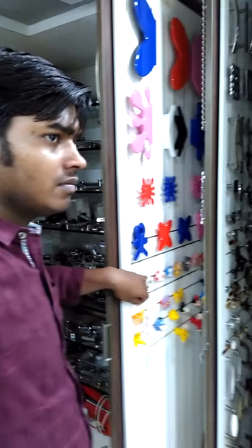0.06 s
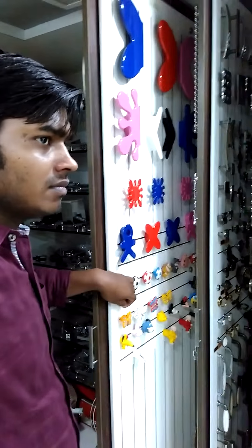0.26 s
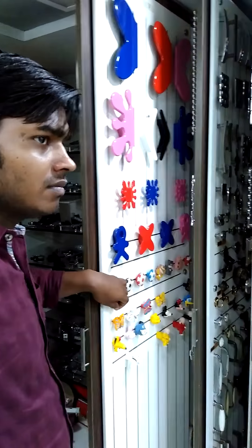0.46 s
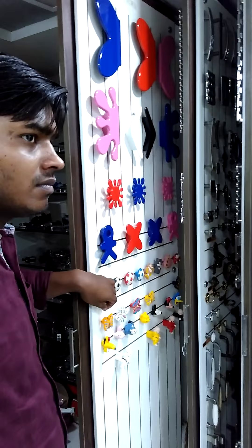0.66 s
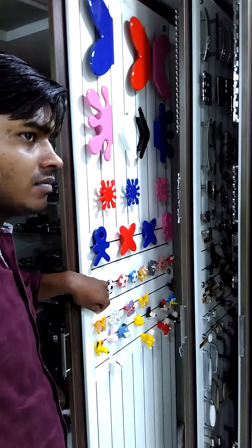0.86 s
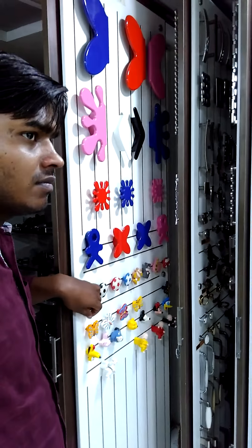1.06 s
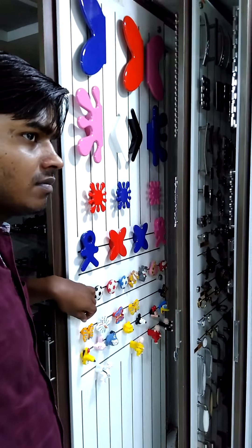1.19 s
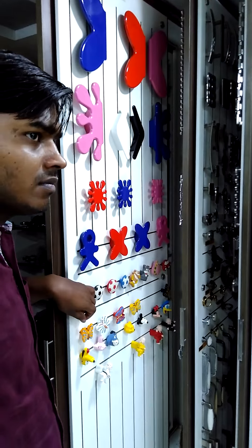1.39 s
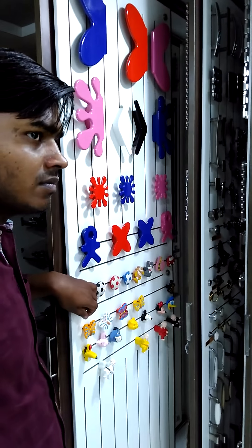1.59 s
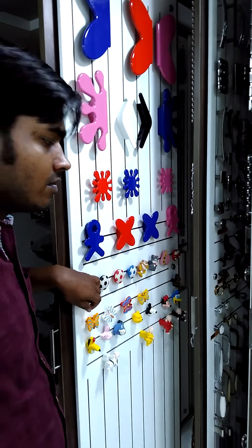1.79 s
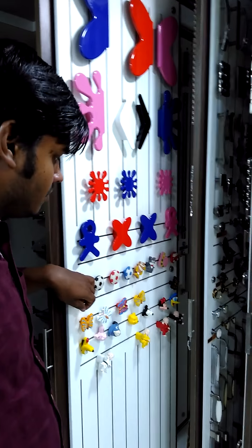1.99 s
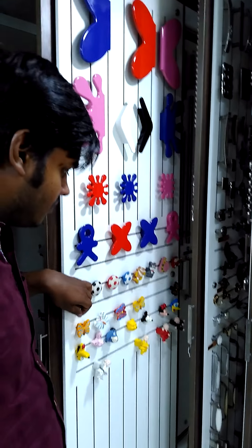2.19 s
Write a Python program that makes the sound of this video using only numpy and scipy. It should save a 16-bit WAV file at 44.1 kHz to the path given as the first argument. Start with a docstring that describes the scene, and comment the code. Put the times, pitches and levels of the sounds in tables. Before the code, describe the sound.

A metal panel slides out of its rack in a shop. Faint movement and a light knock open; a dull frame thud lands near 0.25-0.3 s. Thin high squeals follow to 0.65 s, then rough scraping with jittery groans until 1.2 s. After a lull, scraping and squeals return at 1.4-1.65 s. Loose fittings clatter from 1.83 to 2.04 s. Short room tail, quiet hiss and low building noise.

```python
"""A tall metal display panel is dragged out of its rack in a shop: the runners scrape (banded noise in strokes),
groan by stick-slip (jittery tones) and squeal (brief gliding sines). Low noise swells with the strokes, the frame
thuds as it comes free, and loose fittings knock, then rattle when it stops (decaying modes). Room tail, low building
noise and air lie behind. The right microphone is shaded in the treble; the two ports take the bass in opposite phase."""
import sys
import numpy as np
from scipy import signal
from scipy.fft import rfft, irfft, next_fast_len
from scipy.io import wavfile
from scipy.ndimage import uniform_filter1d, map_coordinates

SR = 44100
rng = np.random.default_rng(int(sys.argv[2]) if len(sys.argv) > 2 else 0)


def put_to_file(sound):
    """Save the sound as 16-bit audio at rate SR, in the file named by the first command-line argument."""
    columns = np.atleast_2d(sound).T  # one column per channel
    safe = np.clip(columns, -1, 1)
    whole_steps = np.round(safe * 32767)
    wavfile.write(sys.argv[1], SR, whole_steps.astype(np.int16))


N = 99225


def scrape():
    """Friction noise ringing in the rails: three noise bands, each following the strokes."""
    # rail response in each band: (frequency [Hz], relative level [dB])
    low_mids = [(400, -15), (900, -0.5), (1500, 0), (2500, 2.5), (2900, -1.5), (3300, -65)]
    # (frequency [Hz], relative level [dB])
    mids = [(2700, -68), (3120, -16.5), (3430, -1), (3800, -10.5), (5300, -8), (6800, -11.5), (7600, -43)]
    # (frequency [Hz], relative level [dB])
    treble = [(6500, -26), (7000, -8), (8000, -3.5), (10000, 1.5), (12000, 0.5), (13500, -10.5),
              (14300, -18)]
    bands = [rush(gain_curve(points), patchy_db=4.6, grain_db=1.7) for points in (low_mids, mids, treble)]
    band_gains = strokes()[1:]
    return amp(-7.0) * (band_gains * bands).sum(axis=0)


def groan():
    """The runner sticks and slips at an uneven rate: a jittery fundamental and its octave."""
    # stick-slip groans: (start [s], length [s], first pitch [Hz], last pitch [Hz],
    # relative level [dB], relative octave level [dB], pitch jitter [share])
    groan_table = [(0.683, 0.035, 1280, 1281, -26.5, -36.5, 0.018),
                   (0.741, 0.068, 1273, 1289, -17.5, -31, 0.0051),
                   (0.805, 0.0858, 1243, 1182, -20, -22.5, 0.013),
                   (0.893, 0.056, 1233, 1261, -22.5, -29, 0.016),
                   (0.966, 0.068, 1443, 1375, -17, -34.5, 0.0277),
                   (1.066, 0.072, 1336, 1162, -20, -27.5, .045),
                   (1.146, 0.086, 1002, 1081, -21, -34.5, 0.0444),
                   (1.478, 0.051, 1480, 1338, -28, -34, 0.068), (1.555, 0.061, 1096, 1128, -26, -26, 0.04)]
    attack_s, t60_s, shimmer_db = 0.0064, 0.012, 3.5
    out = np.zeros(N)
    for start_s, length_s, first_hz, last_hz, db, octave_db, jitter in groan_table:
        phase = glide(start_s, length_s, first_hz, last_hz, jitter * wobble(250))
        tone = amp(db) * np.sin(phase) + amp(octave_db) * np.sin(2 * phase)
        shimmer = amp(3 + shimmer_db * wobble(90.2))
        out += shimmer * burst(start_s, length_s, attack_s, t60_s) * tone
    return out


def squeals():
    """Single rail modes sing briefly and stop short; the low ones are hoarse."""
    # squeals of the runners: (start [s], length [s], first pitch [Hz], last pitch [Hz], relative level [dB])
    squeal_table = [(.374, .035, 9200, 9210, -17), (.415, .054, 9200, 9040, -16),
                    (.49, .041, 9200, 9030, -15.5), (.47, .025, 8050, 8020, -15),
                    (.581, .03, 9170, 9130, -23), (.633, .03, 9130, 9100, -24),
                    (.93, .035, 9040, 9000, -19), (1.03, .035, 8350, 8150, -18),
                    (1.2, .075, 11750, 11900, -23), (1.29, .04, 9720, 9650, -26),
                    (1.515, .045, 7980, 7920, -21), (1.6, .07, 10650, 10570, -23),
                    (.607, .035, 4200, 4350, -36), (1.487, .045, 3460, 3340, -20),
                    (1.582, .07, 3440, 3530, -15.5), (1.175, .07, 3350, 3280, -26),
                    (.41, .022, 2600, 2660, -31), (1.415, .055, 3440, 3400, -26),
                    (.97, .04, 3560, 3490, -26)]
    attack_s, t60_s, waver_hz, hoarse_below_hz = 0.012, 0.035, 45, 5000
    out = np.zeros(N)
    for start_s, length_s, first_hz, last_hz, db in squeal_table:
        hoarse = 4 if first_hz < hoarse_below_hz else 1  # widens and speeds up the waver
        waver = hoarse * waver_hz / first_hz * wobble(60 * hoarse)
        phase = glide(start_s, length_s, first_hz, last_hz, waver)
        level = amp(db + 2.05 * wobble(50 * hoarse))
        out += level * burst(start_s, length_s, attack_s, t60_s) * np.sin(phase)
    return out


def strokes():
    """Stop-and-go of the slide: the gain of each band over all strokes."""
    # (start [s], length [s], then relative levels: rumble [dB], low mids [dB], mids [dB], treble [dB])
    stroke_table = [(0, 0.12, -36.5, -33.5, -54, -50), (0.153, 0.029, -32.5, -36.5, -49, -31),
                    (0.194, 0.059, -51, -38, -41, -17.5), (0.238, 0.025, -16, -25, -13, -17),
                    (0.284, 0.065, -23.5, -35, -36.5, -24), (0.343, 0.037, -23, -25, -28.5, -17),
                    (0.392, 0.06, -30, -32, -41.5, -30), (0.444, 0.078, -41.5, -44, -37.5, -20),
                    (0.558, 0.091, -59, -46.5, -44.5, -23.5), (0.655, 0.059, -49, -31.5, -17.5, -17.5),
                    (0.721, 0.076, -42, -30.5, -21.5, -14.5), (0.785, 0.14, -36, -27.5, -19, -12.5),
                    (0.956, 0.074, -37.5, -26, -15, -12.5), (1.051, 0.086, -29.5, -20, -16.5, -12.5),
                    (1.148, 0.11, -36.5, -28.5, -19, -10.5), (1.264, 0.074, -76, -33.5, -46.5, -26),
                    (1.349, 0.046, -74, -42, -32.5, -18.5), (1.397, 0.09, -67, -33, -16, -13),
                    (1.484, 0.057, -44, -22.5, -18.5, -12.5), (1.551, 0.071, -35, -25.5, -17, -14.5),
                    (1.632, 0.034, -71, -36, -38, -24.5)]
    attack_s, t60_s = 0.023, 0.11
    return sum(amp(levels)[:, None] * burst(start_s, length_s, attack_s, t60_s)
               for start_s, length_s, *levels in stroke_table)


def low_rumble():
    """Broadband low noise swelling with the strokes, over a faint steady floor."""
    # (frequency [Hz], relative level [dB])
    rumble_colour = [(20, -18), (100, 0.5), (280, -2.5), (600, -7.5), (1000, -13), (1600, -34.5)]
    return (amp(-44) + strokes()[0]) * rush(gain_curve(rumble_colour), patchy_db=4.0, grain_db=5.0)


def frame_thuds():
    """The frame thuds as it comes free: low sines with a fast onset and exponential decay."""
    # (time [s], pitch [Hz], relative level [dB])
    thud_table = [(.249, 195, -15), (0.257, 226, -12.5), (0.28, 119, -3.5), (0.301, 169.6, -3)]
    t60_s, onset_s = 0.1, 0.00047
    out = np.zeros(N)
    for start_s, hz, db in thud_table:
        t = np.clip(np.arange(N) / SR - start_s, 0, None)
        envelope = amp(db - 60 * t / t60_s) * (1 - np.exp(-t / onset_s))
        out -= envelope * np.sin(2 * np.pi * hz * t)
    return out


def fittings():
    """Each contact rings the loose fittings anew with a noise crack; many small ones fill the rattle."""
    # single contacts: (time [s], relative level [dB])
    knock_table = [(0.03, -21), (0.252, -30), (0.359, -17), (0.421, -29)]
    # contacts of the final rattle: (time [s], relative level [dB])
    rattle_table = [(1.8242, -22.5), (1.8381, -13), (1.8428, -5.5), (1.8477, -3.5), (1.8552, -7.5),
                    (1.8627, -19), (1.874, -14.5), (1.8962, -17.5), (1.9396, -20), (1.9466, -14.5),
                    (1.9672, -19), (1.9831, -7.5), (1.992, -24), (2.0066, -20.5)]
    # modes of the loose fittings: (mean frequency [Hz], mean relative level [dB])
    fitting_modes = [(1150, -13.5), (1420, -14.5), (1540, 2.5), (1750, 5), (1900, 0), (2260, -2.5),
                     (2500, -1.5), (2660, -3), (2850, -13)]
    # time span of the small contacts: (first [s], last [s])
    rattle_span_s = (1.825, 2.04)
    small_count, small_db = 60, -39  # small_db is the weakest, up to 10 dB is added
    ring_t60_s, crack_t60_s, attack_s, lowpass_hz = 0.022, 0.079, 0.0012, 4000
    first_s, last_s = rattle_span_s
    small = [(first_s + (last_s - first_s) * a, small_db + 10 * b) for a, b in rng.random((small_count, 2))]
    out = np.zeros(N + SR)
    t = np.arange(SR // 5) / SR
    for start_s, db in [*knock_table, *rattle_table, *small]:
        ring = np.zeros(len(t))
        for mode_hz, mode_db in fitting_modes:
            decay = amp(mode_db + 2 * rng.normal() - 60 * t / ring_t60_s)
            cycles = mode_hz * rng.normal(1, 0.017) * t + 0.25 * rng.random() / (2 * np.pi) * (2 * np.pi)
            ring += decay * np.sin(2 * np.pi * cycles)
        crack = amp(-15.5 - 60 * t / crack_t60_s) * rng.standard_normal(len(t))
        onset = 1 - np.exp(-t / attack_s)
        out[round(start_s * SR):][:len(t)] += amp(db - 5) * onset * (ring + crack)
    return filtered(out[:N], lambda hz: 1 / np.hypot(1, (hz / lowpass_hz) ** 2))


def shop(x):
    """Room tail of x: noise in which each frequency dies at its own speed."""
    # (frequency [Hz], t60 [s])
    shop_t60 = [(300, 0.22), (2000, 0.25), (10000, 0.16)]
    hz, t, z = signal.stft(rng.standard_normal(SR // 2), SR, nperseg=256)
    decay = amp(-60 * t / along(shop_t60, hz)[:, None])
    tail = signal.istft(z * decay, SR, nperseg=256)[1]
    return signal.fftconvolve(x, tail / np.linalg.norm(tail))[:N]


def right_port(x):
    """Sound at the right port: inverted, higher sound scattered in phase on its way round, treble shaded."""
    # (frequency [Hz], gain [dB])
    shade = [(200, -8), (600, -3.5), (1200, -6), (3000, -6.5), (5500, -1.5), (8300, -15.5), (13600, -31.5)]
    split_hz, scatter_rad = 570, 2.85
    hz, t, z = signal.stft(x, SR, nperseg=1024)
    drift = smooth_field(z.shape, bins=12, frames=14)
    high = (hz / np.hypot(hz, split_hz))[:, None] ** 2
    scatter = np.exp(1j * scatter_rad * high * drift)
    return signal.istft(-z * scatter * amp(along(shade, hz))[:, None], SR, nperseg=1024)[1][:N]


def building():
    """Steady low noise of the building, falling steeply above 35 Hz, its level slowly wavering."""
    noise = rush(lambda hz: 1 / np.hypot(1, (hz / 35) ** 3), patchy_db=-0.5, grain_db=-0.5)
    return amp(-34.5 + 1.04 * wobble(8.65)) * noise


def shop_air():
    """Air of the shop: steady coloured noise, drawn separately for each side."""
    # (frequency [Hz], relative level [dB])
    air_colour = [(200, -42), (500, -9), (1500, -5.5), (2900, -5.5), (4500, -13.5), (8500, -13.5),
                  (11000, -4), (14200, -19)]
    left_db, right_re_left_db = -44.5, -8.5
    air = [rush(gain_curve(air_colour), patchy_db=1.5, grain_db=1) for side in range(2)]
    return amp(left_db + np.array([[0], [right_re_left_db]])) * air


def amp(db):
    """Amplitude factor of a level in dB."""
    return 10 ** (np.asarray(db) / 20)


def unit(x):
    """x scaled to rms 1."""
    return x / np.sqrt(np.mean(x ** 2) + 1e-20)


def along(points, hz):
    """(Hz, value) points interpolated on a log axis."""
    f, v = np.transpose(points)
    return np.interp(np.log(hz + 1), np.log(f + 1), v)


def gain_curve(points):
    """Response function through (Hz, dB) points."""
    return lambda hz: amp(along(points, hz))


def wobble(rate_hz):
    """A smooth random curve, rate_hz knots a second."""
    knots = rng.standard_normal(int(N * rate_hz / SR) + 4)
    return map_coordinates(knots, [np.arange(N) * rate_hz / SR])


def smooth_field(shape, bins, frames):
    """Random field of rms 1, smoothed over frequency bins and time frames."""
    field = uniform_filter1d(rng.standard_normal(shape), size=bins, axis=0)
    return unit(uniform_filter1d(field, size=frames, axis=1))


def filtered(x, response):
    """x times a response of frequency."""
    m = next_fast_len(N + SR // 2)
    return irfft(rfft(x, m) * response(np.fft.rfftfreq(m, 1 / SR)), m)[..., :N]


def rush(response, patchy_db, grain_db):
    """Grainy noise of rms 1 in which narrow streaks come and go."""
    grainy = rng.standard_normal(N) * amp(grain_db * wobble(400))
    z = signal.stft(grainy, nperseg=512)[2]
    streaks = amp(patchy_db * smooth_field(z.shape, bins=2, frames=10))
    return unit(filtered(signal.istft(z * streaks, nperseg=512)[1][:N], response))


def burst(start_s, length_s, attack_s, t60_s):
    """Envelope: linear attack, hold to length_s, exponential ring-out."""
    t = np.arange(N) / SR - start_s
    return np.clip(t / attack_s, 0, 1) * amp(-60 * np.clip(t - length_s, 0, None) / t60_s)


def glide(start_s, length_s, first_hz, last_hz, waver):
    """Phase [rad] of a tone that slides between two pitches, with a relative waver."""
    hz = np.interp(np.arange(N) / SR, [start_s, start_s + length_s], [first_hz, last_hz])
    return 2 * np.pi * np.cumsum(hz * (1 + waver)) / SR


def scene():
    """Panel with its room tail on both sides, bass in opposite phase, shop air behind."""
    shop_db, bass_right_db, bass_apart_db = -6.5, -3, -8
    panel = amp(6.0) * (scrape() + groan() + squeals() + fittings())
    left = panel + amp(shop_db) * shop(panel)
    right = panel + amp(shop_db - 2.5) * shop(panel)
    low = low_rumble() + frame_thuds() + building()
    low_right = -amp(bass_right_db) * (low + amp(bass_apart_db) * shop(low))
    return np.array([left + low, right_port(right) + low_right]) + shop_air()


def record(dry):
    """Soft clipping at full scale, nothing above the band limit."""
    top_hz = 14233
    clipped = dry / (1 + np.abs(dry) ** 12) ** (1 / 12)
    return filtered(clipped, lambda hz: hz < top_hz)


dry = scene()
out = record(dry)
put_to_file(out)
```